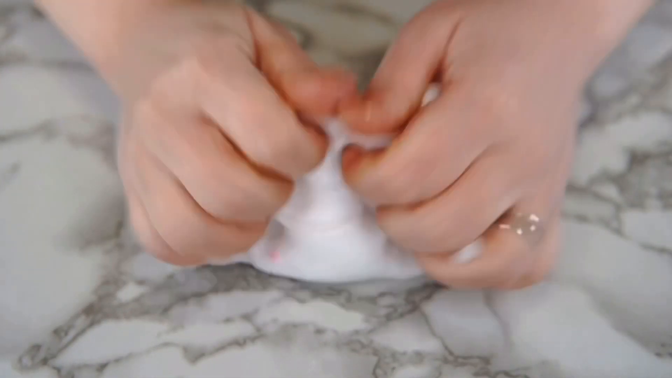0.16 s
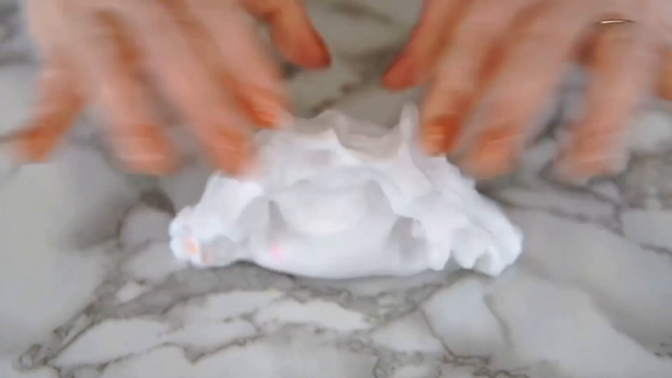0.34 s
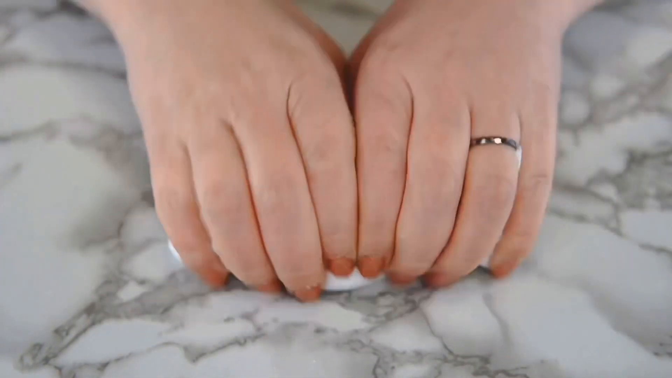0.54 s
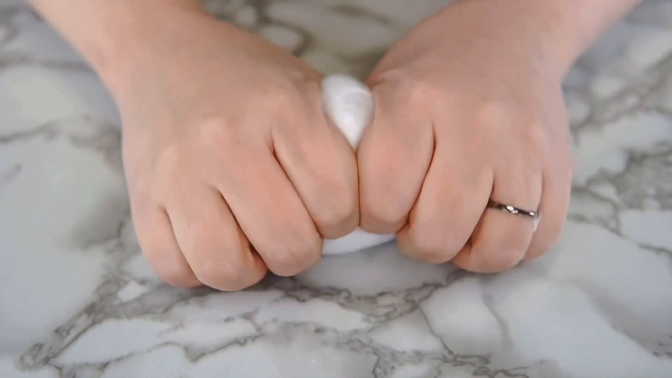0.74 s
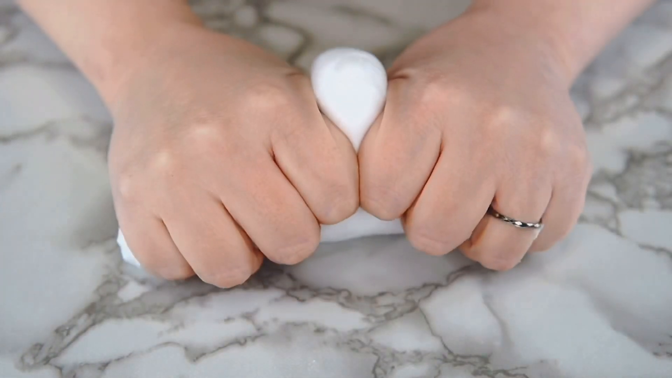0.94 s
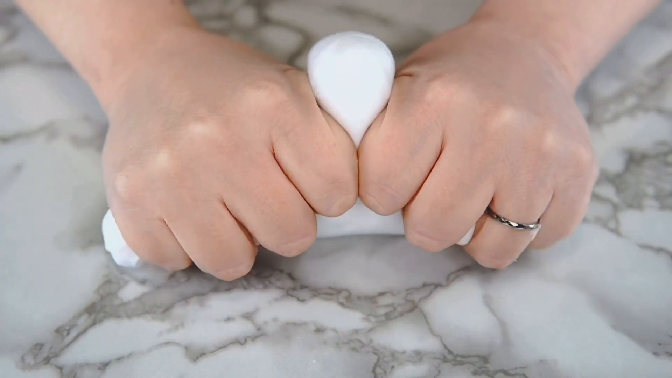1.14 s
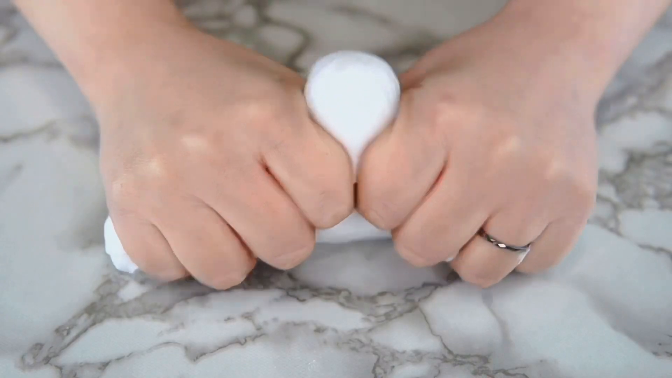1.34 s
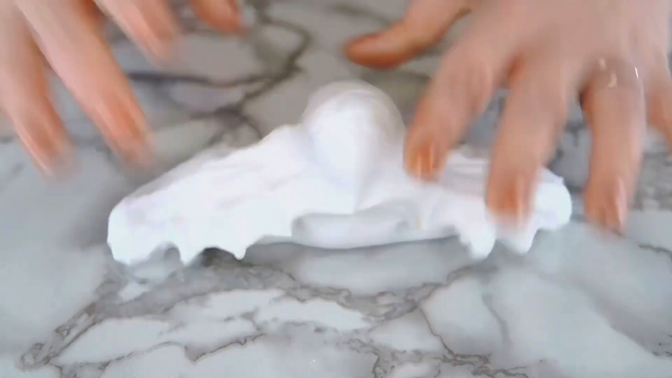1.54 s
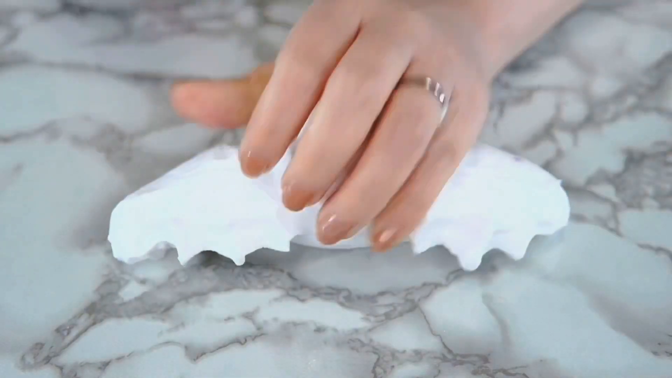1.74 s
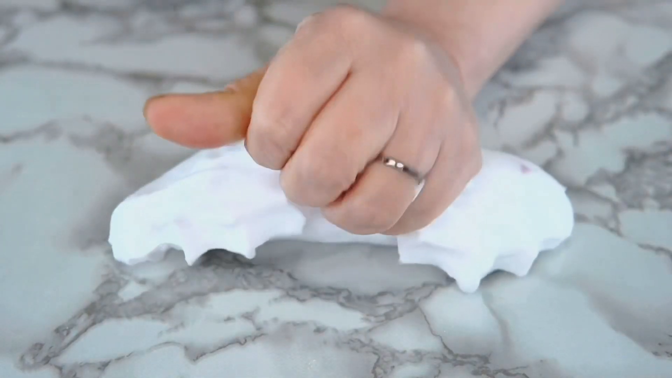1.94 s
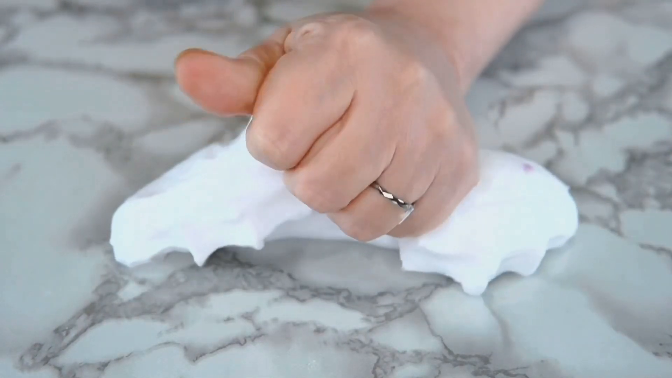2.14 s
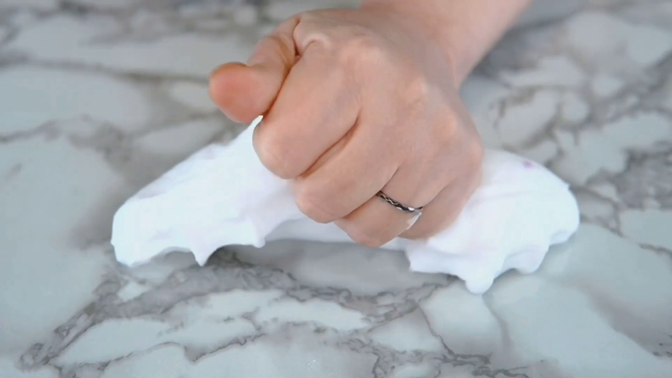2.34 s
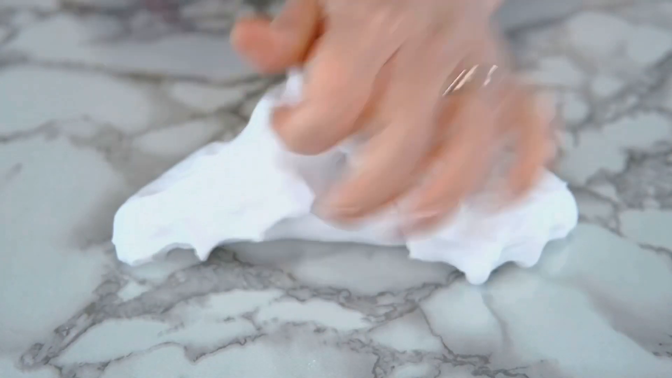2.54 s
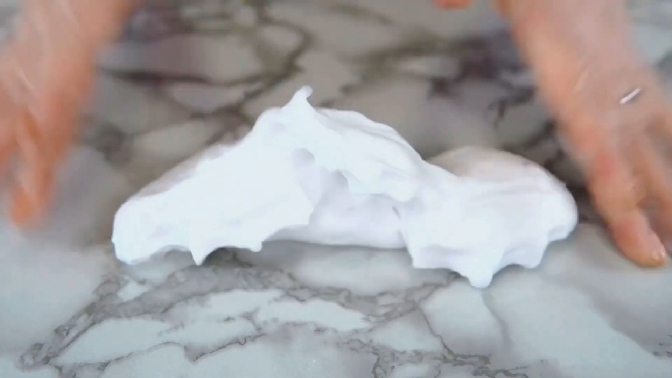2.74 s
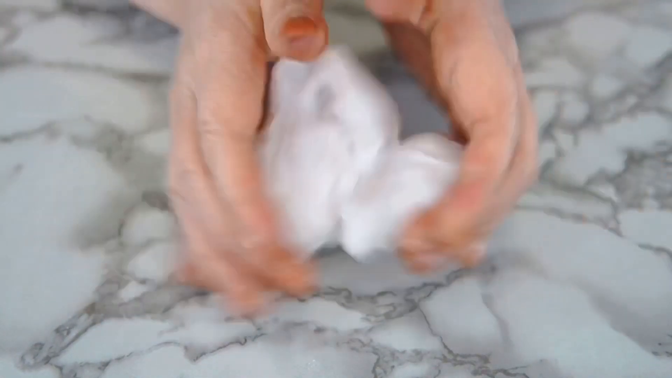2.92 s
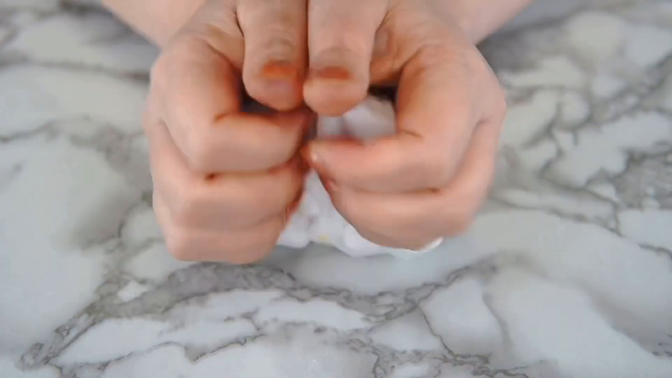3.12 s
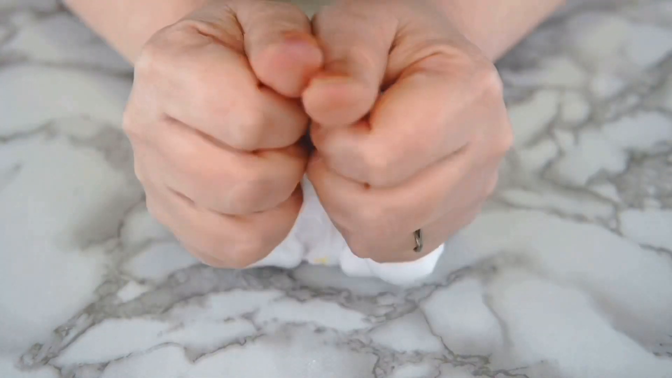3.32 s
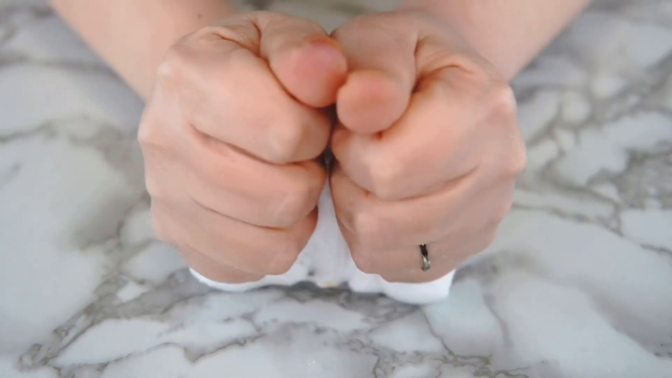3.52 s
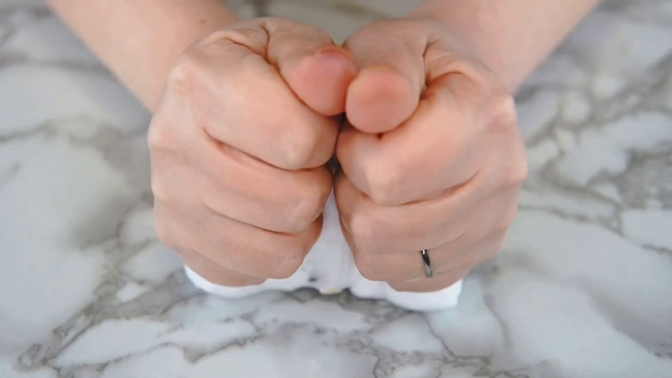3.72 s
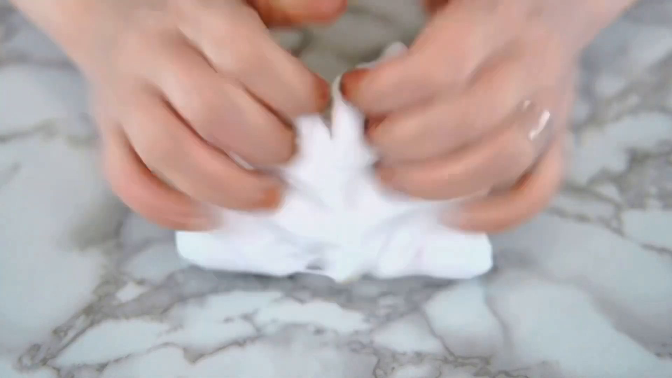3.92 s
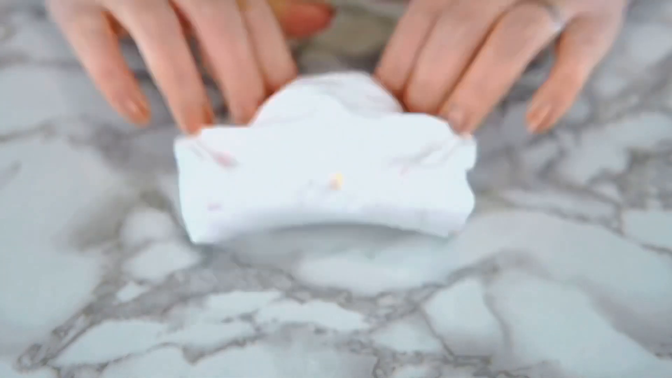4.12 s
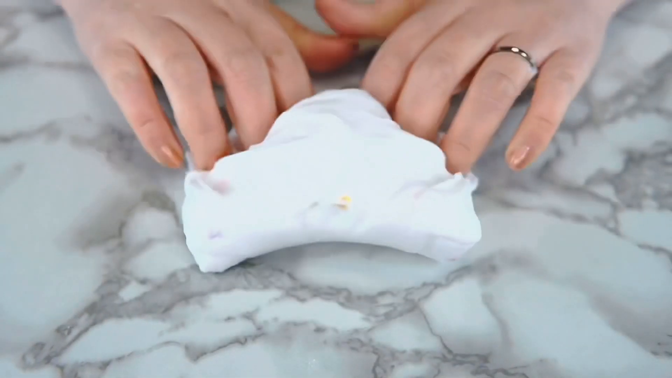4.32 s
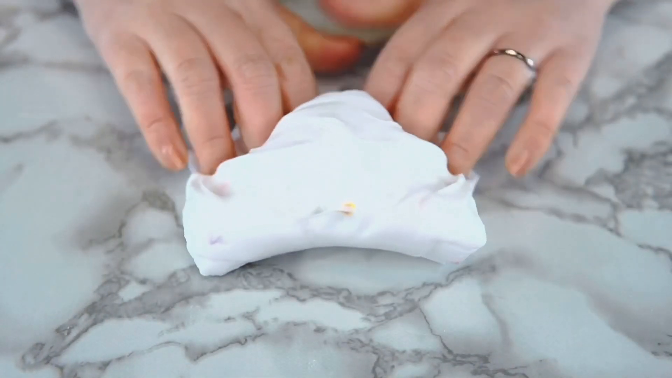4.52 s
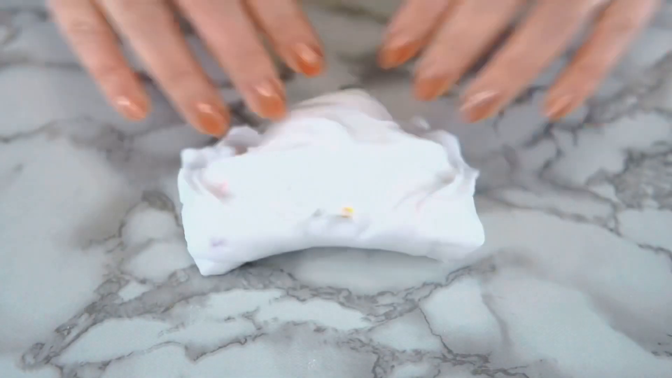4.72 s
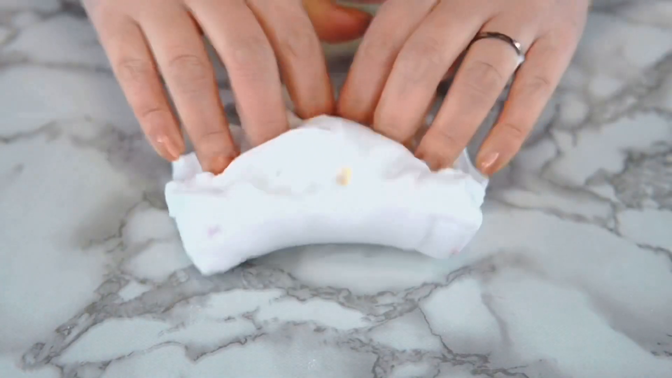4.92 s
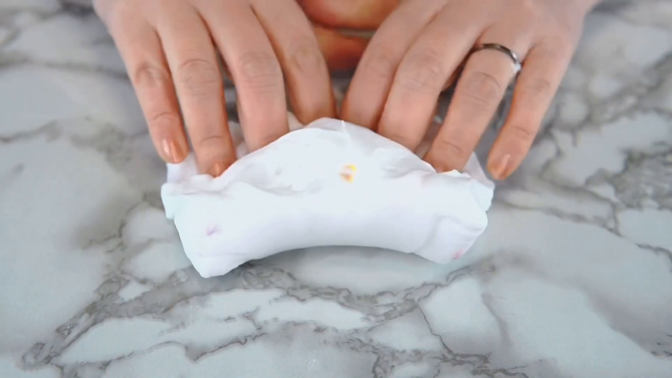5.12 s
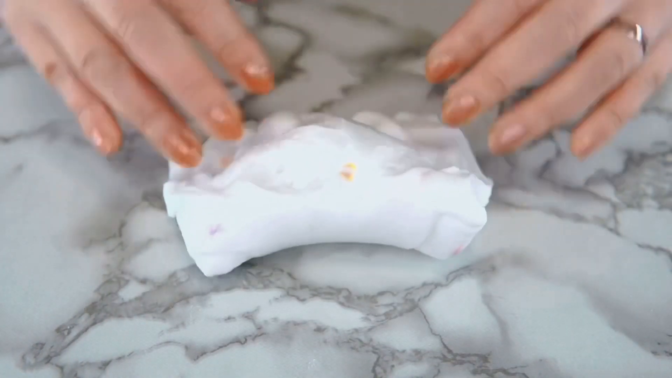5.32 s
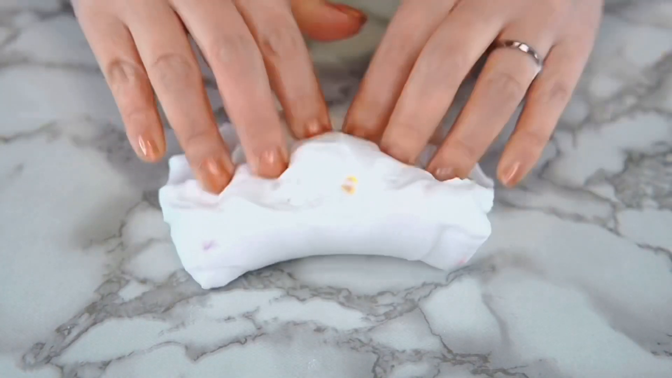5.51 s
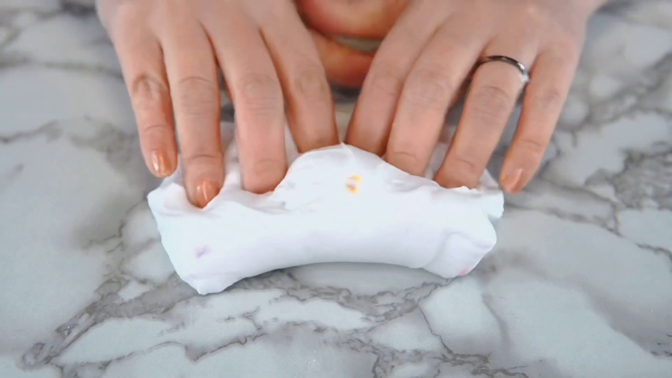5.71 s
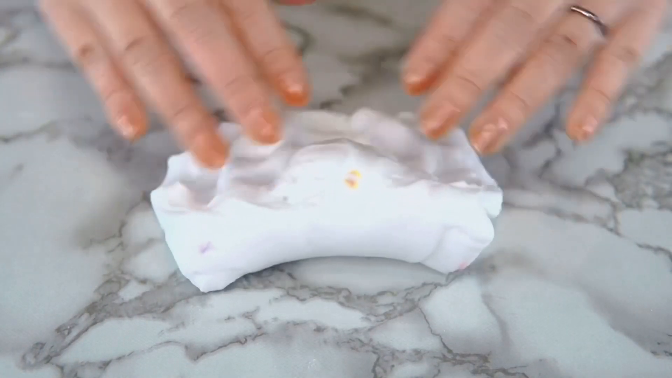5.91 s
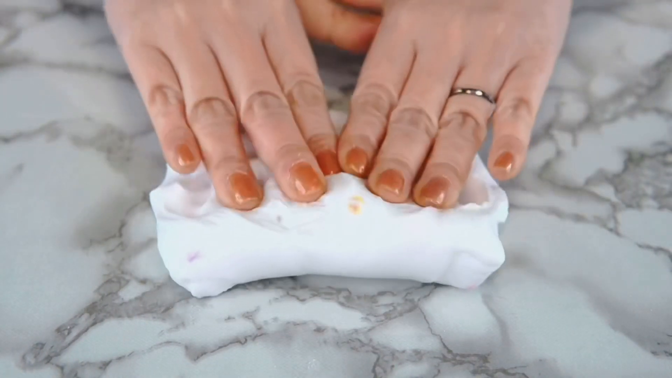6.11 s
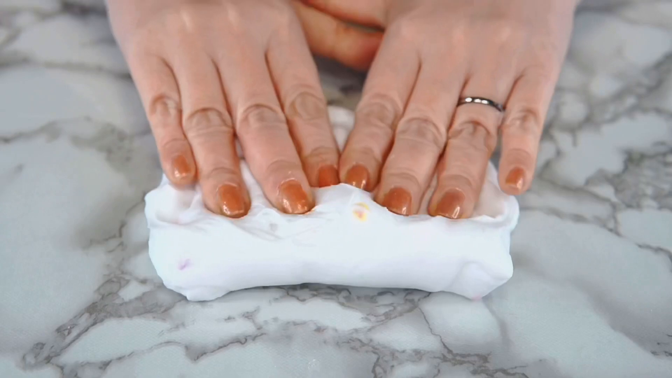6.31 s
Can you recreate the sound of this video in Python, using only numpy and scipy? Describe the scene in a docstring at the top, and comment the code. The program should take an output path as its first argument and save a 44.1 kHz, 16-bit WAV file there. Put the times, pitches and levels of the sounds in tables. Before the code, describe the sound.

Hands squeeze and fold foamy slime, making sharp little pops and crackles over a wet fizz in a quiet room.

```python
"""Sharp pops over a wet fizz: two hands squeeze, fold and press foamy slime on a stone counter.
Trapped air pockets burst with a snap and a plop; large ones thump, and air squeaks once through a slit.
Between pops, tiny cells fizz and larger ones ring wet cavities as a squelch. For a second the hands
close round the lump and the air inside them rings. The counter rumbles; a close pair of microphone
ports hears its low mode in opposite phase. Small quiet room, faint hiss."""
import sys
import numpy as np
from scipy import signal
from scipy.fft import rfft, irfft
from scipy.io import wavfile

SR = 44100
rng = np.random.default_rng(int(sys.argv[2]) if len(sys.argv) > 2 else 0)


def master_out(mix):
    """Clip the mix to full scale and print it as 16-bit PCM to the path in sys.argv[1]."""
    frames = np.transpose(np.atleast_2d(mix))
    ceiling = np.clip(frames, -1, 1)
    pcm = np.round(ceiling * 32767).astype(np.int16)
    wavfile.write(sys.argv[1], SR, pcm)


N = 280476

# bursting pockets (time [s], snap level [dB], snap pitch [Hz], plop re snap [dB],
# nominal plop pitch [Hz], after-fizz re snap [dB], left re right [dB])
POCKETS = [(0.0095, -60, 6100, 22, 1200, -30, 2), (0.0625, -55, 6000, 16, 900, -30, -11),
           (0.08, -42.5, 3300, 16.5, 1350, -20, -3), (0.1, -55, 6000, 25, 1250, -30, 0),
           (0.117, -43.5, 6000, 25, 1350, -30, 2), (0.051, -15.5, 7340, -34, 2210, -21, 9),
           (0.3242, -76.5, 5900, 40, 930, -4, 27), (0.387, -42.5, 5200, 8.5, 1580, -29, 1.5),
           (0.4266, -38, 6600, 8, 825, -24, 7.5), (0.4714, -29, 6660, 9.5, 2060, -14, 2.5),
           (0.5044, -25.5, 8300, -24, 2110, -32.5, -5.5), (0.5203, -1.5, 5800, -20, 2080, -21, 5.5),
           (0.5255, -28, 8440, -13.5, 2500, -14.5, -6), (0.5967, -22, 6440, 3, 2230, -9.5, -2.5),
           (0.606, -3.5, 7100, -6.5, 1650, -21.5, 5.5), (0.647, -25.5, 3600, 3.5, 1480, -2, 6),
           (0.6805, -39.5, 4000, 22.5, 1850, -20, -2), (0.6578, 0.5, 4130, -4.5, 1490, -23, 0),
           (0.7309, -14, 8800, -25.5, 1330, -26, -2), (0.7418, -11, 9900, -35.5, 1230, -31.5, 3),
           (0.7445, -12.5, 8700, -23.5, 1373, -43.5, 2), (0.7567, -11, 4860, 12, 1570, -5.5, 4),
           (0.7605, -29.5, 4000, 21.5, 1460, -11, 2), (0.7657, -0.5, 9350, -23, 1590, -64, 7.5),
           (0.822, -32.5, 8200, -0.5, 1870, -46.5, -4), (0.835, 0.5, 5900, -14.5, 2020, -21.5, 2.5),
           (0.838, -6.5, 5700, -12.5, 2160, -18, -10), (0.941, -13.5, 8150, -15.5, 1640, -21, 5),
           (0.9681, -25.5, 6300, -0.5, 2420, -41, 6), (1.001, -1, 7600, -17, 1620, -16.5, 1.5),
           (1.2346, -33, 4100, 16, 1670, -17.5, 5), (1.263, -13.5, 8300, -12.5, 1210, -18, 1),
           (1.274, -40, 3500, 17, 1600, -15, 2), (1.2992, -38.5, 4970, 19, 1400, -20, 0.5),
           (1.346, -36.5, 4500, 18, 1500, -11.5, 1.5), (1.3631, -45, 4960, 29.5, 1050, -24.5, 3),
           (1.763, -26, 7300, 1, 1330, -17, 6), (1.7879, -13, 5700, 5.5, 1440, -14.5, 5.5),
           (1.7893, -52, 5000, 34, 880, -40, 3), (1.939, -48.5, 5000, 35.5, 586, -37, 1.5),
           (1.9386, -9, 5300, -11, 1523, -14, 8), (2.017, -4.5, 7440, -14, 1770, -13.5, 7.5),
           (2.021, -21.5, 6000, -1.5, 1460, -3, 9), (2.046, -4.5, 8670, -19.5, 1390, -47, 4),
           (2.0597, -15.5, 7400, 1, 1580, -6.5, 5), (2.1035, -9, 8400, -26.5, 2070, -47, 6.5),
           (2.1221, -2, 6650, -1.5, 1500, -17, 0.5), (2.124, -50, 5000, 43, 900, -40, 1.5),
           (2.1557, -4.5, 8700, -21, 1500, -9, -5.5), (2.269, -9.5, 7800, -12.5, 1180, -18.5, 0.5),
           (2.2998, 1, 7200, -6.5, 1590, -5.5, 2), (2.2998, -46.5, 5000, 42, 1004, -40, 2),
           (2.4143, -15.5, 8460, -13, 1660, -52.5, 1), (2.481, -31.5, 8000, -5.5, 1990, -8, 2),
           (2.495, -16.5, 9260, -17, 1880, -44, 2), (2.701, -49, 8700, -3, 1360, -20, 10),
           (2.7575, -19, 6560, -6.5, 2050, -13, 6.5), (2.7923, -25, 6730, 0, 2220, -45, 0),
           (2.807, -13, 6270, -8, 2140, -20, 2.5), (2.8196, -17.5, 3800, -7.5, 2000, -36, 2.5),
           (2.8433, -26.5, 8700, -7.5, 1670, -16, -0.5), (2.8621, -33.5, 4700, 3, 1290, -45, -2),
           (2.9497, -21, 6680, -15.5, 1500, -35, -6.5), (2.9523, -5.5, 6600, -12, 1530, -22, 2),
           (3.0127, -56.5, 6900, 17, 1340, -42, 2), (3.131, -10, 7950, -14.5, 1220, -29, 4.5),
           (3.181, -23.5, 8100, -0.5, 2370, -15, 3), (3.2037, -5.5, 7700, -2.5, 2120, -27.5, 4),
           (3.2155, -18.5, 8740, -30.5, 2250, -13, 2), (3.276, -36.5, 4300, -5.5, 2170, -31, 5.5),
           (3.2892, -32.5, 6400, -2.5, 1680, -30, 6), (3.3039, -10, 7260, -7, 1840, -36, 3.5),
           (3.3317, -15.5, 8500, -29.5, 1860, -34, -1), (3.3487, -22.5, 8400, -3, 2092, -15, 7),
           (3.3532, -20, 8460, -16, 2200, -47, 2), (3.3916, -25, 7600, 4.5, 1820, -24, 4.5),
           (3.447, -30.5, 5750, 2.5, 1980, -19, 2), (3.458, -20.5, 7540, -4.5, 1750, -17, 10),
           (3.4648, 4.5, 7250, -25, 1590, -34, -4.5), (3.485, -14, 8000, -4, 1760, -30.5, 6.5),
           (3.501, -16, 7800, -7, 1410, -49, -1.5), (3.5134, -25, 8000, -7, 2095, -46, 10),
           (3.5315, -20.5, 8940, -3.5, 2240, -23.5, 1.5), (3.5641, -30.5, 7600, 0.5, 1440, -19, 0),
           (3.644, -28, 7200, -3, 1360, -47, 6.5), (3.6629, -2.5, 8280, -13, 2410, -34, 7.5),
           (4.0366, -42, 5000, 21.5, 1400, -32, 3), (4.1587, -42.5, 4190, 12.5, 1410, -26, 6.5),
           (4.2545, -52, 6880, 9, 1887, -26.5, 10.5), (4.353, -42.5, 8760, -31, 1133, -22.5, 2.5),
           (4.468, -30.5, 6960, 5, 1210, -14.5, 4.5), (4.4892, -29.5, 5540, -16, 1920, -26, -11.5),
           (4.4925, -24, 6420, 11.5, 1010, -21, 3), (4.4978, -14, 2950, -2, 1500, -23.5, 5),
           (4.725, -28, 7560, -29.5, 1970, -40, 3.5), (4.805, -23.5, 5500, -9.5, 1580, -13.5, 3),
           (4.8243, -7.5, 7000, -13, 1820, -14, 1.5), (4.9306, -58, 5560, 23, 1530, -14, 1.5),
           (4.9399, -30.5, 7530, -3, 1280, -16, 3), (5.1093, -31, 7850, -12, 880, -28, 4),
           (5.1505, -65, 5020, 24.5, 650, -30, 0), (5.159, -29, 5030, -3.5, 700, -14, 1.5),
           (5.17, -36.5, 2620, 11, 900, -25, -1), (5.1776, -40, 2380, 15.5, 900, -24.5, 0.5),
           (5.451, -64.5, 5180, 23.5, 1070, -18, 12), (5.4723, -19.5, 9920, -54, 1610, -36, 1.5),
           (5.561, -48, 6150, 6, 1070, -46.5, 8), (5.6735, -32.5, 7950, -3.5, 1760, -12.5, 6),
           (5.7095, -64, 5000, 30.5, 700, -40, 8), (5.713, -19.5, 5820, -18, 984, -31, 0),
           (5.754, -50.5, 5000, 23.5, 1400, -30, 2.5), (5.935, -67, 4600, 17.5, 1240, -45, 6.5),
           (5.9869, -43, 8070, -6, 1334, -11, -5), (6.0805, -44, 7620, -15, 1790, -20.5, 1.5),
           (6.2355, -70, 3000, 22, 2500, -30.5, 3)]
# film snap spectrum (frequency [Hz], gain [dB])
SNAP_EQ = [(300, -41), (3000, -1), (9000, 2), (17000, -9)]
# large pockets pushing air at the microphone (time [s], level [dB])
AIR_PUSHES = [(0.759, -33.5), (.836, -33), (1.0008, -26.5), (0.428, -29.5), (1.364, -33), (2.046, -42),
              (3.466, -29), (3.6627, -30)]
# air through a slit (decay [s], pitch [Hz], level [dB])
SLIT_WHISTLE = (0.016, 2340, -31.5)
# squishes (time at full level [s], rise [s], hold [s], fizz [dB], squelch [dB], deep [dB], rumble [dB])
PRESSES = [(0.066, 0.097, 0.041, -35.5, -40, -45, -71), (0.327, 0.015, 0.011, -78, -52.5, -51.5, -59.5),
           (.39, 0.056, 0.024, -59.5, -50.5, -54.5, -61), (0.428, 0.014, 0.007, -52.5, -52.5, -41.5, -54.5),
           (0.555, 0.081, 0.04, -55, -49, -55, -75), (0.663, 0.022, 0.012, -35, -30, -41, -71.5),
           (0.76, 0.015, 0.0019, -32.5, -30.5, -44, -66), (0.843, 0.015, 0.039, -27, -39, -48.5, -78.5),
           (1.008, 0.021, 0.012, -31, -41.5, -60, -72.5), (1.288, 0.095, 0.023, -36, -31, -40, -59.5),
           (1.341, 0.027, 0.017, -39, -41.5, -40, -55.5), (1.765, 0.013, 0.0052, -48, -46.5, -59, -89),
           (1.79, 0.011, 0.0054, -42, -37.5, -37.5, -86), (1.939, 0.011, 0.0027, -25.5, -26, -38, -73),
           (2.068, 0.079, 0.0042, -30.5, -48, -56, -81), (2.129, 0.0099, 0.017, -18, -31, -36, -77),
           (2.301, 0.0066, 0.015, -28.5, -34.5, -45.5, -85), (2.383, 0.13, 0.071, -43, -47, -63.5, -78.5),
           (2.649, 0.037, 0.0046, -95, -84.5, -86.5, -70.5), (2.767, 0.1, 0.08, -48.5, -46.5, -73, -85),
           (2.949, 0.0059, 0.002, -63, -59, -56.5, -100), (3.128, 0.024, .004, -88, -58, -56.5, -99),
           (3.193, 0.035, 0.0032, -56, -45.5, -66.5, -109), (3.352, 0.067, 0.0305, -56, -53.5, -72, -105),
           (3.478, 0.036, 0.008, -41, -58, -68, -87), (3.673, 0.025, 0.0041, -35, -41, -71, -72),
           (3.841, 0.09, 0.0094, -42.5, -44, -55, -83), (3.98, 0.113, 0.054, -48.5, -57.5, -71.5, -86),
           (4.166, 0.031, 0.012, -79, -54, -74.5, -100), (4.501, 0.06, 0.02, -42, -38, -44.5, -59.5),
           (4.805, 0.05, 0.004, -58, -70, -75, -80.5), (4.823, 0.0092, 0.0072, -33, -41, -52.5, -77),
           (4.954, 0.048, 0.007, -57, -53, -63.5, -87), (5.116, 0.027, 0.012, -52, -56, -43, -67.5),
           (5.16, 0.061, 0.011, -46.5, -42.5, -36.5, -58), (5.43, 0.035, 0.048, -79, -67.5, -70.5, -100),
           (5.542, 0.042, 0.017, -71, -69, -66.5, -100), (5.696, 0.041, 0.041, -46.5, -44, -37, -57.5),
           (5.99, 0.1, 0.033, -72.5, -75, -82, -99), (6.293, 0.068, 0.02, -48.5, -47.5, -50.5, -63.5)]
# fall after a squish (fizz [dB/s], squelch [dB/s], deep [dB/s], rumble [dB/s])
PRESS_RELEASE = [358.2, 390, 450, 200.2]
# foam and resting hands between squishes (time [s], fizz [dB], rumble [dB])
IDLE_LEVELS = [(0, -93, -77), (.29, -77.5, -84), (.55, -41.5, -100), (.82, -55, -89), (1.16, -72.5, -89),
               (1.47, -69, -79), (1.585, -83.5, -82.5), (1.66, -68.5, -95.5), (1.72, -78, -98),
               (1.95, -52, -92), (2.3, -52, -99), (2.61, -85.5, -82.5), (2.9, -61.5, -103),
               (3.4, -62.5, -105), (3.61, -68.5, -90), (3.75, -52.5, -91), (3.9, -61.5, -74),
               (4.13, -71.5, -97), (4.4, -86.5, -100), (4.68, -80.5, -77.5), (4.8, -67, -79),
               (5.07, -84, -96), (5.3, -89.5, -83.5), (5.62, -84, -97), (5.85, -80.5, -78.5),
               (6.2, -85, -104), (6.36, -77, -88.5)]
# tiny-cell spectrum (frequency [Hz], gain [dB])
FIZZ_EQ = [(1650, -32.5), (2800, -3.5), (4180, 4), (10500, 5), (14500, -11.5), (15800, -21), (16500, -49)]
# wet cavities (frequency [Hz], bandwidth [Hz], gain [dB])
SQUELCH_MODES = [(706, 120, -5), (1070, 190, 5), (1570, 380, 1.5), (2250, 670, 1)]
# deep cavities (frequency [Hz], bandwidth [Hz], gain [dB])
DEEP_MODES = [(274.7, 160, -7.5), (405, 41, 4), (520, 24, 5), (642.3, 28, 6), (813, 120, 1.5)]
# air inside closed hands (frequency [Hz], bandwidth [Hz], gain [dB])
HAND_MODES = [(1200, 200, -4.5), (2040, 66, 13), (2360, 99, 9), (2700, 270, 5.5)]
# counter rumble spectrum (frequency [Hz], gain [dB])
RUMBLE_EQ = [(20, -11.5), (60, -6), (150, -1.5), (300, -9.5), (600, -48)]
# room decay (frequency [Hz], T60 [s])
ROOM_DECAY = [(200, 0.11), (1400, 0.28), (8000, 0.17)]
# reflection spectrum (frequency [Hz], gain [dB])
ROOM_EQ = [(100, -55), (2000, -41.5), (15000, -44.5)]
# room and microphone hiss spectrum (frequency [Hz], gain [dB])
HISS_EQ = [(15, -48), (25, -17.5), (120, -6.5), (902, -1.5), (1150, -1.5), (3410, -15), (8370, -11.5),
           (13600, -25), (16500, -50.5)]
# stereo width (frequency [Hz], side re mid [dB])
SIDE_EQ = [(60, 1.5), (250, -6.5), (500, -7.5), (1200, -21), (4400, -6.5), (9000, -7.5), (14000, 2.5)]

FAINT_COUNT, FAINT_OVER_IDLE_DB, FAINT_SPREAD_DB = 70, 15, 3
SQUEAK_START_S = 0.9685
CUPPED_FROM_S, CUPPED_TO_S, CUPPED_RING_DB = 2.72, 3.72, -52.5
PRESS_RISE_DB, SQUELCH_SWELL_DB, JOLT_DB = 48.5, 2.5, -22
IDLE_SQUELCH_DB, IDLE_DEEP_DB = -2.5, -14   # re idle fizz
CELL_Q, CELL_PATCH_DB = 13, 3
HISS_DB, CEILING, CUTOFF_HZ = -77.5, 0.76, 17500


def pops():
    """A film snaps with a short bright ring; the opening pocket plops with falling pitch."""
    length = 2000
    out, t = np.zeros((2, N + length)), np.arange(length) / SR
    snap_env = (t / 0.00043) * np.exp(1 - t / 0.00022)
    plop_env = (t / 0.0012) ** 2 * np.exp(2 - 2 * t / 0.00082)
    for time_s, snap_db, snap_hz, plop_db, plop_hz, _, pan_db in POCKETS + faint_pockets():
        noise, side = rng.standard_normal((2, length))
        film = cavities(noise, [(snap_hz, 3500, 0)])
        snap = (np.sin(2 * np.pi * snap_hz * t) + 0.5 * film + 0.087 * noise) * snap_env
        snap += 0.063 * film * np.exp(-t / 0.0038)   # shreds keep tearing
        snap = coloured(snap + 0.4 * side * snap_env * [[1], [-1]], SNAP_EQ)
        cycles = plop_hz * (0.62 * t + 0.96 * 0.0012 * (1 - np.exp(-t / 0.00092)))
        plop = np.sin(2 * np.pi * cycles) * plop_env
        pop = from_db(snap_db) * (snap * (t < 0.03) + from_db(plop_db) * plop)
        start = int(time_s * SR)
        out[:, start:start + length] += pop * from_db([[pan_db / 2], [-pan_db / 2]])
    return signal.sosfilt(signal.butter(4, 380, "high", fs=SR, output="sos"), out[:, :N])


def faint_pockets():
    """Small pockets burst at random, above the idle fizz; rows as in POCKETS."""
    when, size, snap, plop, pitch, pan = rng.random((FAINT_COUNT, 6)).T
    time_s = when * (N / SR)
    idle_db = np.interp(time_s, *np.transpose(IDLE_LEVELS)[:2])
    snap_db = idle_db + FAINT_OVER_IDLE_DB - FAINT_SPREAD_DB * np.log(1 - size)
    snap_hz, plop_hz = 5000 + 4000 * snap, 1200 + 1000 * pitch
    plop_db, pan_db = -20 + 25 * plop, -2 + 9 * pan
    return list(zip(time_s, snap_db, snap_hz, plop_db, plop_hz, np.zeros(FAINT_COUNT), pan_db))


def cupped_ring(bursts):
    """Pops ring the air inside the closed hands."""
    return from_db(CUPPED_RING_DB) * cavities(bursts * hands_closed() + 1e-18, HAND_MODES)


def thumps():
    """A large pocket pushes air; pitch sinks fast from mids to bass."""
    out, t = np.zeros(N), np.arange(4000) / SR
    cycles = 40 * t + 900 * 0.002 * (1 - np.exp(-t / 0.002)) + 200 * 0.007 * (1 - np.exp(-t / 0.007))
    push = np.sin(2 * np.pi * cycles) * np.minimum(t / 0.00029, 1) * np.exp(-t / 0.0054)
    for time_s, level_db in AIR_PUSHES:
        start = int(time_s * SR)
        out[start:start + len(t)] += from_db(level_db) * push
    return out


def squeak():
    """Air escapes through a slit: a short breathy whistle."""
    decay_s, hz, level_db = SLIT_WHISTLE
    t = np.arange(N) / SR - SQUEAK_START_S
    envelope = (t > 0) * np.exp(-np.abs(t) / decay_s)
    breath = cavities(rng.standard_normal(N), [(hz, 90, 0)])
    return from_db(level_db) * envelope * (np.sin(2 * np.pi * hz * t) + 0.54 * breath)


def kneading():
    """Squishes and pops drive the fizz and squelch of the lump; pressing shakes the counter."""
    fizz_db, squelch_db, deep_db, rumble_db = press_levels_db()
    _, snap_db, _, plop_db, _, after_db, _ = np.transpose(POCKETS)
    fizz_power = from_db(fizz_db) ** 2 + collapse_power(snap_db + after_db, t60_s=0.03)
    squelch_power = from_db(squelch_db) ** 2 + collapse_power(snap_db + plop_db - 14, t60_s=0.054)
    foam = np.sqrt(fizz_power) * fizz() + np.sqrt(squelch_power) * squelch()
    foam = signal.sosfilt(signal.butter(3, 400, "high", fs=SR, output="sos"), foam)
    deep = deep_squelch(deep_db, snap_db + plop_db + JOLT_DB)
    return stereo(foam + deep) + counter(rumble_db)


def press_levels_db():
    """Fizz, squelch, deep and rumble levels: each squish rises, holds and falls back to idle."""
    t = np.arange(N) / SR
    idle_s, *idle_db = np.transpose(IDLE_LEVELS)
    fizz_db, rumble_db = [np.interp(t, idle_s, column) for column in idle_db]
    power = from_db([fizz_db, fizz_db + IDLE_SQUELCH_DB, fizz_db + IDLE_DEEP_DB, rumble_db]) ** 2
    for full_s, rise_s, hold_s, *levels_db in PRESSES:
        near = slice(max(int((full_s - 0.4) * SR), 0), int((full_s + 0.5) * SR))
        attack_db = PRESS_RISE_DB * (np.maximum(full_s - t[near], 0) / rise_s) ** 2
        release_db = np.c_[PRESS_RELEASE] * np.maximum(t[near] - full_s - hold_s, 0)
        power[:, near] += from_db(np.c_[levels_db] - attack_db - release_db) ** 2
    return 10 * np.log10(power)


def collapse_power(levels_db, t60_s):
    """Neighbouring cells give way: power jumps at each listed pop, then decays."""
    jumps = np.zeros(N)
    jumps[pop_samples() + 40] = from_db(levels_db) ** 2
    return signal.lfilter([1], [1, -from_db(-60 / (t60_s * SR)) ** 2], jumps)


def fizz():
    """Tiny cells burst, each ringing briefly at one of 14 pitches; patches of like cells come and go."""
    train = grains(per_s=18000, spread_db=-1, clump_db=1.68)
    band = rng.integers(0, 14, N)
    rings = 0
    for k, hz in enumerate(np.geomspace(2600, 15500, 14)):
        patch = from_db(CELL_PATCH_DB * drift(rate_hz=9))
        rings += patch * cavities(train * (band == k), [(hz, hz / CELL_Q, 0)])
    return rms_one(coloured(rings, FIZZ_EQ))


def squelch():
    """Larger cells ring wet cavities that swell separately; closed hands damp them and add a ring."""
    train = grains(per_s=1400, spread_db=0, clump_db=1)
    wet = 0
    for k, (hz, width_hz, level_db) in enumerate(SQUELCH_MODES):
        swell = from_db(level_db + SQUELCH_SWELL_DB * drift(rate_hz=25))
        wet += (-1) ** k * swell * np.sqrt(width_hz) * cavities(train, [(hz, width_hz, 0)])
    closed = hands_closed()
    hollow = cavities(grains(per_s=2527, spread_db=5, clump_db=-1), HAND_MODES)
    return rms_one(wet) * from_db(-6 * closed) + 0.28 * closed * hollow


def deep_squelch(level_db, jolt_db):
    """Deep cavities, driven by bursting cells and jolted by plops, ring on after each press."""
    train = from_db(level_db) * grains(per_s=900, spread_db=1, clump_db=2)
    jolts = np.zeros((2, N))
    jolts[:, pop_samples()] = from_db(jolt_db) * rng.uniform(0.6, 1, (len(POCKETS), 2)).T
    rms = np.sqrt(np.mean(from_db(level_db) ** 2))
    return rms * cavities(train + jolts, DEEP_MODES)


def counter(level_db):
    """The pressed counter rumbles; its low mode reaches the two ports in opposite phase."""
    rumble = rms_one(coloured(rng.standard_normal(N), RUMBLE_EQ))
    low_mode = from_db(16) * cavities(rng.standard_normal(N), [(100, 40, 0)])
    return from_db(level_db) * np.array([rumble + low_mode, rumble - low_mode])


def room(x):
    """Dense reflections, unlike in each channel, lasting longest in the mids."""
    t, edges_hz = np.arange(SR // 3) / SR, 100 * 2.0 ** np.arange(8)
    tail = 0
    for low_hz, high_hz in zip(edges_hz, edges_hz[1:]):
        bandpass = signal.butter(2, [low_hz, high_hz], "band", fs=SR, output="sos")
        band = signal.sosfilt(bandpass, rng.standard_normal((2, len(t))))
        hz = np.sqrt(low_hz * high_hz)
        tail += from_db(at_hz(ROOM_EQ, hz) - 60 * t / at_hz(ROOM_DECAY, hz)) * band
    mid, side = tail
    response = np.array([mid + 0.5 * side, mid - 0.5 * side])
    return signal.fftconvolve(x.mean(0)[None], response, axes=1)[:, :N]


def hiss():
    """Steady room and microphone noise."""
    return from_db(HISS_DB) * stereo(rms_one(coloured(rng.standard_normal((2, N)), HISS_EQ)))


def hands_closed():
    """True while both hands enclose the lump."""
    t = np.arange(N) / SR
    return (t > CUPPED_FROM_S) & (t < CUPPED_TO_S)


def pop_samples():
    """Start sample of each listed pop."""
    return (np.array(POCKETS)[:, 0] * SR).astype(int)


def grains(per_s, spread_db, clump_db):
    """Two independent trains of unevenly sized clicks, their level swelling in clumps."""
    sizes = from_db(spread_db * np.minimum(rng.exponential(1, (2, N)), 5))
    signs = rng.choice([-1, 1], (2, N))
    hits = rng.random((2, N)) < per_s / SR
    return sizes * signs * hits * from_db(clump_db * drift(rate_hz=79))


def cavities(x, modes):
    """Parallel resonators, alternating signs; rms 1."""
    out = 0
    for k, (hz, width_hz, level_db) in enumerate(modes):
        r = np.exp(-np.pi * width_hz / SR)
        poles = [1, -2 * r * np.cos(2 * np.pi * hz / SR), r * r]
        out += (-1) ** k * from_db(level_db) * signal.lfilter([1 - r * r, 0, r * r - 1], poles, x)
    return rms_one(out)


def drift(rate_hz):
    """Low-passed random wander; rms 1."""
    r = np.exp(-2 * np.pi * rate_hz / SR)
    return rms_one(signal.lfilter([1], [1, -2 * r, r * r], rng.standard_normal(N + SR))[SR:])


def stereo(pair):
    """Mid and side to left and right, wide in bass and treble."""
    mid, side = pair[0], coloured(pair[1], SIDE_EQ)
    return np.array([mid + side, mid - side])


def coloured(x, eq):
    """x filtered by a (frequency [Hz], gain [dB]) table."""
    size = x.shape[-1]
    hz = np.arange(size // 2 + 1) * SR / size
    return irfft(rfft(x) * from_db(at_hz(eq, hz)), size)


def at_hz(table, hz):
    """Table value, interpolated over log frequency."""
    table_hz, values = np.transpose(table)
    return np.interp(np.log(hz + 1), np.log(table_hz + 1), values)


def rms_one(x):
    """x scaled to rms 1."""
    return x / np.sqrt(np.mean(x ** 2) + 1e-20)


def from_db(db):
    """dB to amplitude gain."""
    return 10 ** (np.asarray(db) / 20)


def scene():
    """Close slime, room reflections, hiss."""
    bursts, mass = pops(), kneading()
    bursts = bursts + cupped_ring(bursts) + thumps() + squeak()
    return bursts + mass + hiss() + room(bursts + 0.68 * mass)


def record(dry):
    """Soft peak limit, then a steep low-pass."""
    rounded = dry / (1 + np.abs(dry / CEILING) ** 4) ** (1 / 4)
    return signal.sosfilt(signal.cheby2(16, 90, CUTOFF_HZ, fs=SR, output="sos"), rounded)


dry = scene()
out = record(dry)
master_out(out)
```